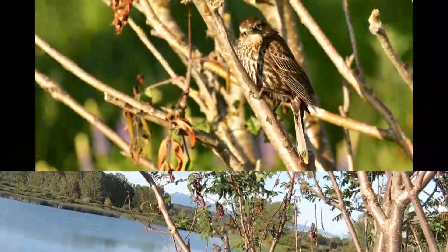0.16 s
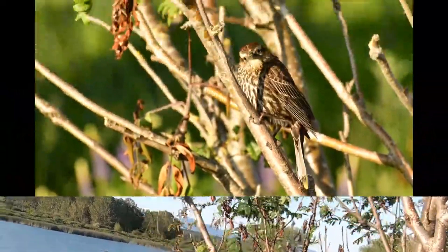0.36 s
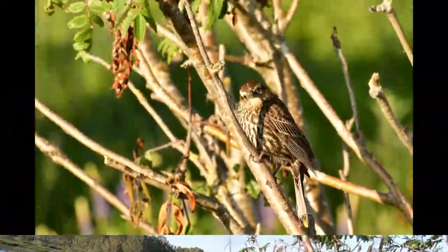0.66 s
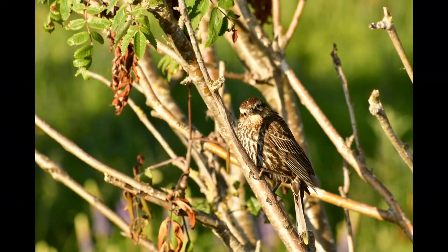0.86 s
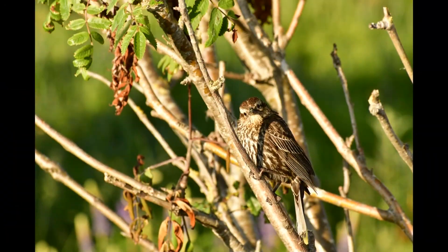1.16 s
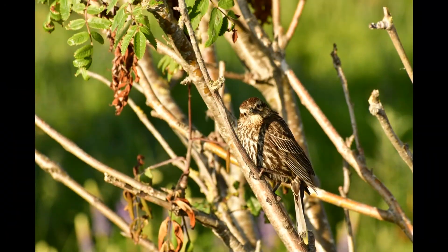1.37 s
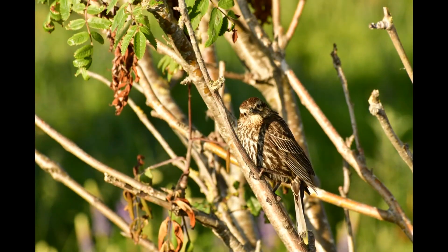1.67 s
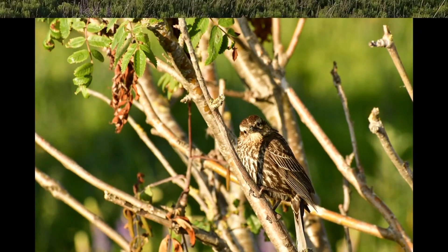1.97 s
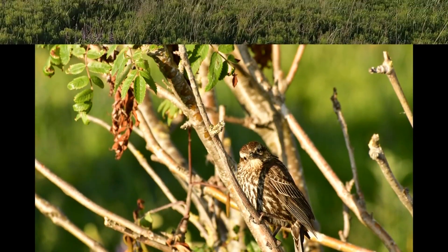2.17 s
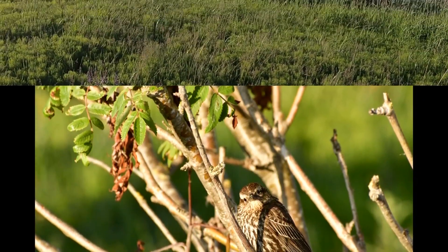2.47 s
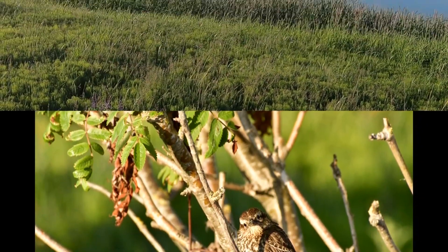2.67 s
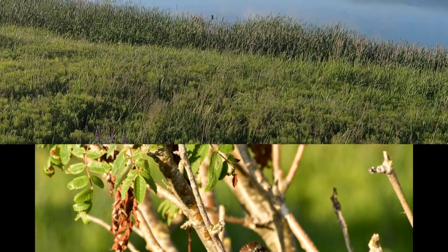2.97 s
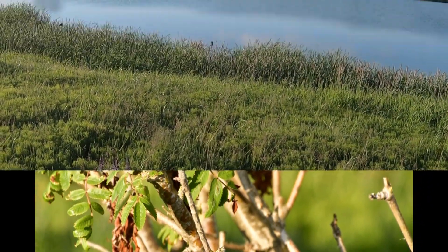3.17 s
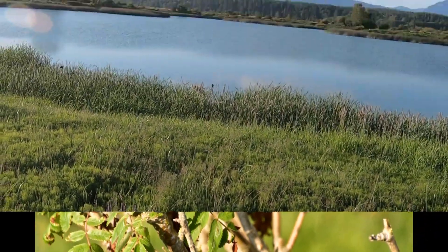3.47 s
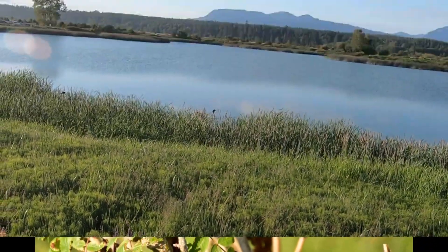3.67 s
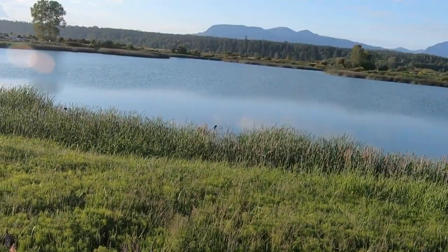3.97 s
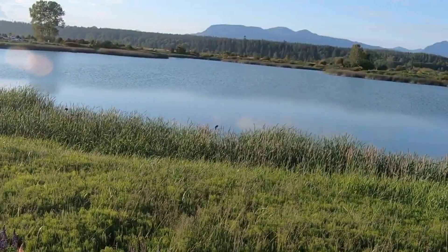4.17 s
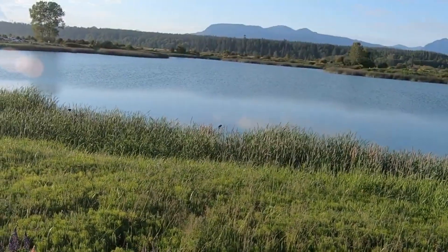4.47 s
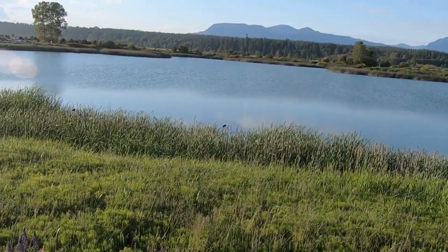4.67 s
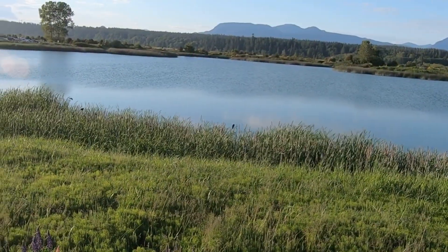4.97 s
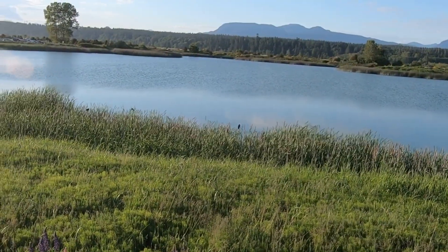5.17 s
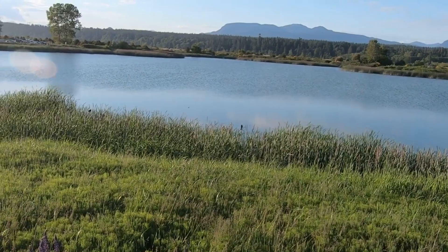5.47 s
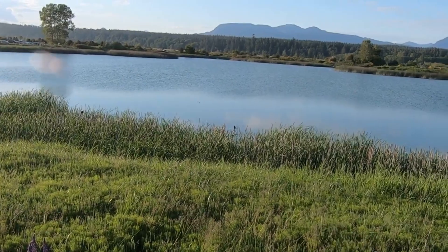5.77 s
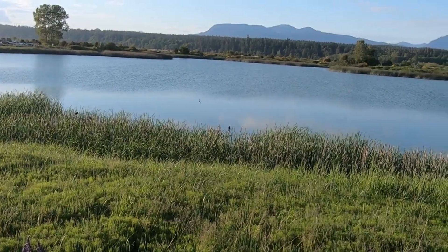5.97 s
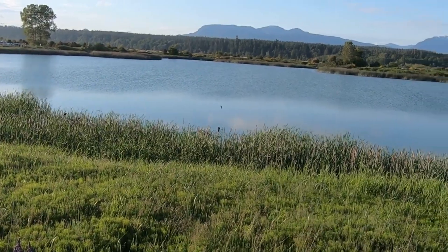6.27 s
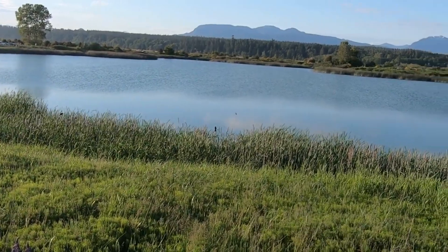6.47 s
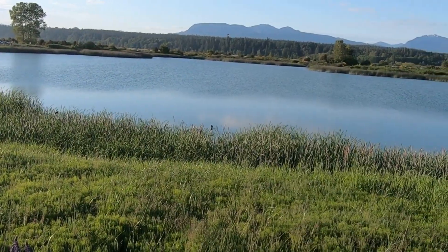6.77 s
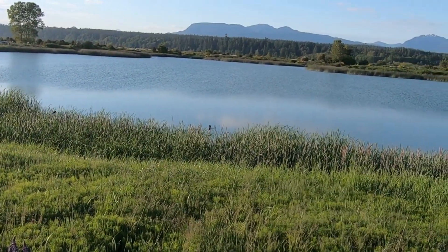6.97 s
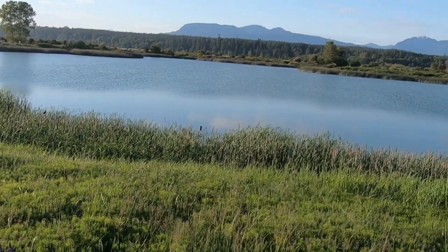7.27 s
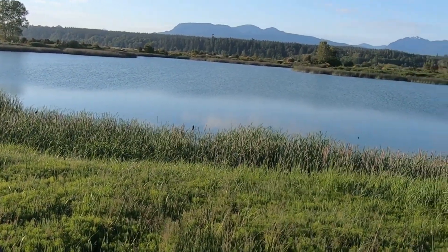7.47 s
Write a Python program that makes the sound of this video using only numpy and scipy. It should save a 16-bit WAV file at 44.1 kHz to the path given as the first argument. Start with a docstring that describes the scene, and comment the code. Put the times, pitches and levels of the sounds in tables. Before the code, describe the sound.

A faint low haze and soft hiss of open air run throughout on a lake shore. In the first second a distant bird repeats a small chip and whistle four times. From about 0.1 to 2.6 seconds a close songbird sings clear, high, slurred whistle pairs, getting lower and louder, each note ringing on among the trees. Far birds twitter, buzz and trill softly behind it from about 1 to 2.5 seconds. The singer pauses, and a distant bird gives two faint, hoarse, falling cries at about 2.5 and 3.4 seconds. At 3.5 seconds the close bird starts a run of sharp sweeping notes that quicken, drop in pitch and swell, with a few faint falling whistles behind. They are loudest from 6 to 7.2 seconds, distorting slightly at the peaks. The echo then fades under two thin, distant notes near 7.4 seconds.

```python
"""Over a faint low haze on a lake shore, a far bird chips and a close songbird starts pairs of slurred whistles.
Its second phrase is a run of sweeps that quicken and grow louder, until the peaks overload.
Each note is a nearly pure tone from the syrinx, roughened by breath, that rings on among the trees.
Farther off, other birds twitter, buzz and trill, and one gives two hoarse, falling cries."""
import sys
import numpy as np
from scipy import signal
from scipy.fft import rfft, irfft, next_fast_len
from scipy.io import wavfile
from scipy.ndimage import uniform_filter1d, map_coordinates

SR = 44100
rng = np.random.default_rng(int(sys.argv[2]) if len(sys.argv) > 2 else 0)


def materialize(psi):
    """Save the field psi as 16-bit PCM at rate SR to the path in sys.argv[1].

    A 1-D psi becomes a single channel; in a 2-D psi each row is a channel.
    """
    bounded = np.clip(np.atleast_2d(psi).T, -1, 1)
    quanta = np.round(bounded * 32767).astype(np.int16)
    wavfile.write(sys.argv[1], SR, quanta)


N = 335601
TOP_HZ = 15750  # band limit


def amp(db):
    """Decibels to gain."""
    return 10 ** (np.asarray(db) / 20)


def unit(x):
    """Scales to an RMS of one."""
    return x / np.sqrt(np.mean(x ** 2) + 1e-20)


def along(points, hz):
    """Reads a curve of (f/Hz, value) points on a log axis."""
    f, v = np.transpose(points)
    return np.interp(np.log(hz + 1), np.log(f + 1), v)


def wobble(rate, size):
    """A smooth random modulator, rate knots a second."""
    knots = rng.standard_normal(int(size * rate / SR) + 4)
    return map_coordinates(knots, [np.arange(size) * rate / SR])


def filtered(x, response):
    """Equalises x with a gain curve over frequency."""
    n = x.shape[-1]
    m = next_fast_len(n + SR // 4)
    return irfft(rfft(x, m) * response(np.fft.rfftfreq(m, 1 / SR)), m)[..., :n]


def clock(start, end):
    """The time of each sample from start to end."""
    return np.arange(round(start * SR), max(round(end * SR), round(start * SR) + 2)) / SR


def fade(t, attack, release):
    """A linear fade in and out."""
    return np.clip((t - t[0]) / attack, 0, 1) * np.clip((t[-1] - t) / release, 0, 1)


def add(track, t, sound):
    """Lays a sound into the track at its times."""
    place = track[max(round(t[0] * SR), 0):][:len(sound)]
    place += sound[:len(place)]


def spread(pair, side_db):
    """Left and right from a mid and a weaker side signal."""
    side = amp(side_db) * pair[1]
    return np.array([pair[0] + side, pair[0] - side])


def arch(t, first, middle, last):
    """A parabolic glide through three pitches."""
    u = np.linspace(0, 1, len(t))
    return first * (1 - u) * (1 - 2 * u) + 4 * middle * u * (1 - u) + last * u * (2 * u - 1)


# EQ of the low haze and of the open air's hiss: f/Hz, level/dB
HAZE_EQ = [(15, -41.5), (25, -11), (54, -10.5), (71, -25), (92, -7), (108, -11.5), (123, -19), (145, -9.5),
           (178, -15.5), (411, -0.5), (513, -7.5), (563, -11.5), (1020, -17.5), (1590, -19), (2100, -17.5),
           (2730, -41.5), (4620, -120)]
HISS_EQ = [(1500, -25), (2200, 0), (4000, -2), (5500, -3.5), (7000, -11.5), (8500, -18.5), (11000, -31),
           (15000, -44)]
def air(spectrum, db, side_db, drift_db):
    """A bed of far-off noise that drifts a little in level."""
    noise = unit(filtered(rng.standard_normal((2, N)), lambda hz: amp(along(spectrum, hz))))
    return spread(noise, side_db) * amp(db + drift_db * wobble(0.99, N))


# reverb time among the trees: f/Hz, 60 dB decay/s
TREE_DECAY = [(1500, 0.88), (2900, 2.56), (3600, 2.35), (5500, 2.4), (7000, 2.2), (11000, 1.01)]
def lingering(pitch_hz=4180, width_hz=120, db=-37):
    """The echo of an earlier high note is still dying among the trees."""
    noise = rng.standard_normal((2, N))
    ring = unit(filtered(noise, lambda hz: np.exp(-((hz - pitch_hz) / width_hz) ** 2)))
    return spread(ring, side_db=-14.5) * amp(db - 60 * np.arange(N) / SR / along(TREE_DECAY, pitch_hz))


# a whistle's overtones: multiple, level/dB
HARMONICS = [(2, -30.5), (3, -34.5), (4, -53.5)]
# how the beak radiates them: f/Hz, level/dB
BEAK_EQ = [(5500, 11), (7000, 6.5), (8000, -0.5), (9000, -4.5), (10400, -10), (11300, -16.5),
           (13000, -13.5), (15500, -18)]
def syrinx(hz, envelope, jitter=0.0048, shimmer_db=0.72, strain=1.33):
    """A bird's voice: a slightly unsteady tone with weak overtones."""
    phase = 2 * np.pi * np.cumsum(hz * (1 + jitter * wobble(300, len(hz)))) / SR
    overtones = sum(amp(db + along(BEAK_EQ, k * hz)) * np.sin(k * phase) * (k * hz < TOP_HZ)
                    for k, db in HARMONICS)
    # harder blowing makes the tone richer, and at full effort it turns shrill
    richness = np.sqrt(envelope) + strain * np.clip((envelope - .9) / 0.41, 0, 1)
    shimmer = amp(shimmer_db * wobble(150, len(hz)))
    return envelope * shimmer * (np.sin(phase) + richness * overtones)


def far_note(start, length, pitches, db, buzz=0, buzz_hz=70, swing_hz=130, flicker_db=2):
    """A faint whistle flickering through the leaves; buzz flutters its pitch and level."""
    t = clock(start, start + length)
    flutter = buzz * np.sin(2 * np.pi * buzz_hz * (t - start) + .5 * wobble(120, len(t)))
    envelope = amp(db + flicker_db * wobble(150, len(t))) * (1 + 0.49 * flutter) * fade(t, .009, .006)
    return t, syrinx(arch(t, *pitches) + swing_hz * flutter, envelope, jitter=0.0054 + .025 * buzz)


# motif cues: t/s, level/dB
MOTIF_CUES = [(0.041, -30.5), (0.264, -29), (.493, -29.5), (0.756, -33.5)]
# its notes: delay/s, length/s, first f/Hz, middle f/Hz, last f/Hz, level/dB over the cue
MOTIF_NOTES = [(0, 0.018, 4900, 4660, 4230, 2), (0.029, .103, 2900, 2940, 2830, -5),
               (0.158, 0.029, 2600, 2690, 2460, -7)]
def motif():
    """A far bird repeats a chip, a whistle and a blip."""
    calls = np.zeros(N)
    for start, db in MOTIF_CUES:
        for delay, length, *pitches, note_db in MOTIF_NOTES:
            add(calls, *far_note(start + delay, length, pitches, db + note_db))
    return calls


def near_echoes(x, echo_db=-23, decay_s=0.12):
    """Early reflections: ground and branches close by scatter each note back."""
    t = clock(0, .12)
    impulse = rng.standard_normal((2, len(t))) * amp(-60 * t / decay_s) * (t > .002)
    impulse = spread(impulse / np.linalg.norm(impulse[0]), side_db=-3.5)
    return amp(echo_db) * signal.fftconvolve(x[None], impulse, axes=1)[:, :N]


def woods(x, echo_db=-19):
    """The trees answer with a long, diffuse tail."""
    hz, t, bands = signal.stft(rng.standard_normal((2, 2 * SR)), SR, nperseg=256)
    tail = signal.istft(bands * amp(-60 * t / along(TREE_DECAY, hz)[:, None]), SR, nperseg=256)[1]
    tail = spread(tail / np.linalg.norm(tail[0]), side_db=-11)
    return amp(echo_db) * signal.fftconvolve(x[None], tail, axes=1)[:, :N]


# soft notes close more slowly: level/dB, attack/s, release/s
SLUR_FADES = [(-13.5, 0.015, .009), (-2.5, 0.015, .005)]
def slur(start, end, pitch_hz, db, shape, bow=0, tilt_db=0):
    """One whistle that bends and swells along its shape."""
    t = clock(start, end)
    u = np.linspace(0, 1, len(t))
    ratios, swell_db = np.transpose(shape)
    levels, *edges = np.transpose(SLUR_FADES)
    attack, release = [np.interp(db, levels, edge) for edge in edges]
    level_db = db + np.interp(u, [0, .5, 1], swell_db) + tilt_db * (u - .5)
    hz = pitch_hz * (arch(t, *ratios) + arch(t, -bow, bow / 2, -bow))
    return t, syrinx(hz, amp(level_db) * fade(t, attack, release))


# an arched whistle and a short dip: start t/s, break t/s, f/Hz, arch level/dB, dip level/dB
ARCH_CUES = [(0.144, 0.203, 3614, -17, -11), (0.523, 0.602, 3287, -11, -11.5),
             (0.918, 1.001, 3128, -7.5, -11), (1.27, 1.361, 3020, -4.5, -7.5),
             (1.617, 1.713, 2972, -3, -8.5), (1.973, 2.068, 2938, -2, -7), (2.332, 2.43, 2917, -3, -10)]
# a fall and a rise: start t/s, break t/s, f/Hz, fall level/dB, rise level/dB
VEE_CUES = [(0.307, .372, 3976, -13, -7), (0.711, 0.767, 3592, -8, -10), (1.091, 1.152, 3410, -3.5, -4),
            (1.438, 1.507, 3380, -2.5, -1), (1.787, 1.858, 3318, -2, -1.5), (2.145, 2.215, 3305, 1, 1.5),
            (2.509, 2.58, 3260, -2, -2)]
# each note at its start, middle and end: pitch ratio, level/dB over the cue
ARCH_SHAPE = [(0.93, -8.5), (0.99, 0.5), (0.99, -2.5)]
DIP_SHAPE = [(0.99, -0.5), (0.92, 0), (0.8945, -5)]
FALL_SHAPE = [(1.1, -3), (1, 0), (.855, -3.5)]
RISE_SHAPE = [(.925, -9), (1.004, -0.5), (1.076, -1)]
# the highest falls are hollow and fade early, the lowest bulge: f/Hz, pitch bow, level tilt/dB
FALL_BOWS = [(3250, .012, -4), (3390, -0.0052, 5), (3580, -.01, 6), (4010, -0.017, -14)]
# lower rises last longer: f/Hz, end t/s after the break
RISE_ENDS = [(3320, .06), (3420, .056), (3600, .049)]
def slurs(dip_gap_s=0.0032, dip_s=.041, rise_gap_s=.006):
    """The singer's first phrase: two kinds of whistle pair in turn, getting lower, longer and louder."""
    song = np.zeros(N)
    for start, turn, hz, arch_db, dip_db in ARCH_CUES:
        add(song, *slur(start, turn, hz, arch_db, ARCH_SHAPE))
        add(song, *slur(turn + dip_gap_s, turn + dip_gap_s + dip_s, hz, dip_db, DIP_SHAPE))
    pitches, *bends = np.transpose(FALL_BOWS)
    for start, turn, hz, fall_db, rise_db in VEE_CUES:
        bow, tilt_db = [np.interp(hz, pitches, bend) for bend in bends]
        add(song, *slur(start, turn, hz, fall_db, FALL_SHAPE, bow, tilt_db))
        add(song, *slur(turn + rise_gap_s, turn + along(RISE_ENDS, hz), hz, rise_db, RISE_SHAPE))
    return song


# EQ of the air in the singer's throat: f/Hz, level/dB
BREATH_EQ = [(2000, -28.5), (3000, -12), (5000, -1), (7000, -1), (10000, -11.5), (11500, -20.5),
             (15000, -33)]
def rasp(song, db=-44):
    """Rushing air roughens each note in step with its strength; the leaves spread it for a moment."""
    strength = np.sqrt(abs(uniform_filter1d(song ** 2, size=90)))
    noise = unit(filtered(rng.standard_normal(N), lambda hz: amp(along(BREATH_EQ, hz))))
    breath = amp(db) * strength * noise
    return breath + near_echoes(breath, echo_db=-2, decay_s=.25)[0]


def ground(x, delay_s=0.02, db=-27):
    """The ground slaps back one faint copy of each note."""
    return amp(db) * np.pad(x, (round(delay_s * SR), 0))[:N]


def twitter(start=1.05, end=2.3, pitch_hz=4800, db=-42, count=45):
    """A far bird's jumble of tiny slurs."""
    calls = np.zeros(N)
    for when, life, high, slope, loud in rng.random((count, 5)):
        at = start + when * (end - start)
        t = clock(at, at + 0.013 + 0.018 * life)
        hz = pitch_hz * 2 ** (0.58 * (high - .5) + (slope - .5) * np.linspace(-.2, .2, len(t)))
        add(calls, t, syrinx(hz, amp(db + 10 * (loud - 1)) * fade(t, 0.0018, 0.0023)))
    return calls


# thin-note cues: t/s, length/s, f/Hz, level/dB, buzz depth 0-1
THIN_CUES = [(1.128, 0.053, 5100, -37.5, 1), (1.197, 0.031, 4130, -32, 1), (1.416, .03, 5300, -37, 0.7),
             (1.495, .035, 3930, -28, .6), (1.563, 0.036, 5460, -35.5, 0.4), (1.782, .035, 4100, -24.5, .8),
             (1.926, .04, 4410, -27, 0.7), (2.354, .075, 5100, -36.5, 0.9), (2.642, .075, 5000, -38, 0.7),
             (2.962, 0.077, 5000, -45, 0.73), (3.227, 0.046, 3830, -50, 0), (3.322, .075, 5080, -49.5, 0.3),
             (3.732, 0.08, 5100, -43, 0.4), (7.3, .037, 5610, -34.5, 0), (7.44, 0.046, 5750, -37.5, 0)]
def thin_notes():
    """Far birds hold short, thin notes, most of them buzzy."""
    calls = np.zeros(N)
    for start, length, hz, db, buzz in THIN_CUES:
        add(calls, *far_note(start, length, (hz, hz, hz), db, buzz))
    return calls


def trill(start=1.4, step_s=.1172, length_s=.042, hz=4850, db=-36.5, step_db=0.76, count=8):
    """A far bird's even run of downslurs, in a crescendo."""
    calls = np.zeros(N)
    pitches = hz * np.array([1.27, 1, .82])
    for k in range(count):
        add(calls, *far_note(start + k * step_s, length_s, pitches, db + k * step_db))
    return calls


# cry cues: t/s, length/s, f/Hz, level/dB
CRY_CUES = [(2.544, .315, 458.5, -43), (3.398, .34, 450, -45.5)]
# EQ of the cry's clear opening: f/Hz, level/dB
CRY_EQ = [(850, -28.5), (1330, 0.5), (1800, -3), (2250, -6.5), (2700, -12.5)]
def cries(fall=.2, rough=.028, grit=.6):
    """A far bird's nasal cry starts clear, then sinks and turns hoarse as its throat resonance falls."""
    calls = np.zeros(N)
    for start, length, pitch_hz, db in CRY_CUES:
        t = clock(start, start + length)
        u = np.linspace(0, 1, len(t))
        hoarse = np.clip((u - .22) / 0.17, 0, 1)
        glide = 1 - fall * u ** 1.3 - 0.091 * np.exp(-u / .05)
        hz = pitch_hz * glide * (1 + rough * hoarse * wobble(300, len(t)))
        phase = 2 * np.pi * np.cumsum(hz) / SR
        throat_hz = arch(t, 2250, 1960, 1700)
        voice = np.zeros(len(t))
        for k in range(2, 7):
            clear = amp(along(CRY_EQ, k * hz)) * (1 - u) ** 2
            throat = hoarse / (1 + ((k * hz - throat_hz) / 190) ** 2)
            voice += (clear + throat) * np.sin(k * phase)
        # hoarseness: the cycles fall into uneven groups of four
        voice *= 1 + grit * hoarse * np.sin(phase / 4 + wobble(60, len(t)))
        add(calls, t, amp(db) * unit(voice) * fade(t, 0.028, 0.078))
    return calls


def upstroke(end, held_hz, db):
    """A short, ever steeper rise; a louder one starts earlier."""
    length = np.interp(db, [-6, 3], [.014, .0195])
    t = clock(end - length, end + 0.0017)
    hz = held_hz * (1.246 + .52 * np.exp((t - end) / .0058))
    return t, syrinx(hz, amp(db) * fade(t, length * 0.76, 0.0032))


def plunge(at, end, held_hz, db, held_db, crossing_hz=4800, flick_hz=590):
    """The pitch dives from its peak, settles on a swelling held note and flicks up as that stops."""
    t = clock(at - .021, end)
    u = t - at
    peak_hz = 4700 + .6 * held_hz
    dive = peak_hz - (peak_hz - crossing_hz) * np.exp(np.minimum(u, 0) / .0042)
    settle = held_hz + 650 * np.exp(-abs(u) / .014)
    settle += (crossing_hz - held_hz - 650) * np.exp(-abs(u) / .0021)
    flick = flick_hz * (1 + .1 * rng.standard_normal()) * np.exp((t - end) / 0.0023)
    # the dive flares as it crosses the throat's resonance, then the level sags
    sag_db = min(db - 4, -9.5)
    flare = amp(np.interp(u, [-0.018, -0.0077, -0.0039, -0.000054, 0.0061],
                          [db - 23.5, db - 19, db - 8, db + 1, sag_db]))
    swell = (amp(held_db) - amp(sag_db)) * np.interp(t, [at + 0.0049, end - .012], [0, 1]) ** 0.92
    return t, syrinx(np.where(u < 0, dive, settle) + flick, (flare + swell) * fade(t, 0.014, 0.0019))


def afternote(start, held_hz, db):
    """A soft, lower note from the other side of the syrinx."""
    t = clock(start, start + 0.021)
    return t, syrinx(held_hz * arch(t, 0.827, 0.894, 0.836), amp(db) * fade(t, 0.0055, 0.0094))


# sweep cues: plunge t/s, held f/Hz, upstroke level/dB, plunge level/dB, held level/dB
SWEEP_CUES = [(3.5254, 3484, -46, -31.5, -11.5), (3.8599, 3466, -35, -25, -8.5),
              (4.189, 3453, -26, -11.5, -3.5), (4.4598, 3432, -26, -19.5, -5),
              (4.7207, 3387, -18.5, -14, -3), (4.9637, 3353, -15, -10.5, -3.5),
              (5.2035, 3339, -19, -16, -8), (5.4588, 3344, -17.5, -10.5, -3), (5.6789, 3204, -5.5, -9, -3),
              (5.872, 3014, -3, -3, -5), (6.0622, 2942, 1, 2, -3.5), (6.247, 2906, 1, 2.5, -4.5),
              (6.433, 2864, 1.5, 1.5, -5.5), (6.6141, 2760, 2.5, 0, -5), (6.798, 2790, 2.5, 5, -6.5),
              (6.9799, 2767, 3, 2.5, -8), (7.165, 2775, .5, -0.5, -8)]
# lower notes are held longer: held f/Hz, length/s
HOLDS = [(2780, 0.073), (3470, .0585)]
# the upstroke ends ahead of the plunge: held f/Hz, lead/s
UPSTROKE_LEADS = [(2780, .029), (2900, .0295), (3030, .034), (3200, .032), (3380, .03)]
def sweeps():
    """The singer's second phrase: upstroke, plunge and afternote, ever faster, lower and louder."""
    song = np.zeros(N)
    for at, held_hz, upstroke_db, plunge_db, held_db in SWEEP_CUES:
        end = at + along(HOLDS, held_hz)
        add(song, *upstroke(at - along(UPSTROKE_LEADS, held_hz), held_hz, upstroke_db))
        add(song, *plunge(at, end, held_hz, plunge_db, held_db))
        add(song, *afternote(end + 0.00077, held_hz, held_db - 10.5))
    return song


# downslur cues: t/s, middle f/Hz, level/dB
DOWNSLUR_CUES = [(3.581, 4850, -45), (4.421, 4400, -38.5), (5.08, 4220, -36), (5.257, 4600, -35.5),
                 (5.395, 4520, -37.5)]
def downslurs(length_s=.042):
    """Single falling whistles from far birds."""
    calls = np.zeros(N)
    for start, hz, db in DOWNSLUR_CUES:
        add(calls, *far_note(start, length_s, hz * np.array([1.14, 1, .92]), db))
    return calls


def scene():
    """The mix: singer up front, other birds behind, their echoes and the open air."""
    song = slurs() + sweeps()
    song = song + rasp(song)
    far = motif() + trill() + downslurs() + thin_notes() + cries()
    haze = air(HAZE_EQ, db=-46, side_db=-25.5, drift_db=0.07)
    hiss = air(HISS_EQ, db=-55.5, side_db=-17, drift_db=.4)
    # far birds arrive wetter; the farthest is heard only as scattered sound
    thicket = near_echoes(twitter(), echo_db=-1, decay_s=0.64)
    echoes = ground(song) + near_echoes(song + amp(7) * far) + woods(song + amp(7.5) * far) + lingering()
    return song + amp(0.5) * far + thicket + echoes + haze + hiss


def record(dry, ceiling=0.95, lopsided=.045, hiss_db=-23):
    """The input stage flattens the loudest peaks, one polarity more; the mix is then band-limited."""
    oversampled = signal.resample_poly(dry, 4, 1, axis=1)
    limit = ceiling * (1 + lopsided * np.sign(oversampled))
    clipped = oversampled / (1 + np.abs(oversampled / limit) ** 20) ** (1 / 20)
    # a brief burst of broad hiss rides on the loudest peaks
    peaks = np.maximum(abs(oversampled) - 1, 0)
    peak_hiss = amp(hiss_db) * np.sqrt(peaks) * rng.standard_normal(oversampled.shape[1])
    out = signal.resample_poly(clipped + peak_hiss, 1, 4, axis=1)
    return filtered(out, lambda hz: hz / np.hypot(hz, 20) / (1 + (hz / TOP_HZ) ** 200))


dry = scene()
out = record(dry)
materialize(out)
```